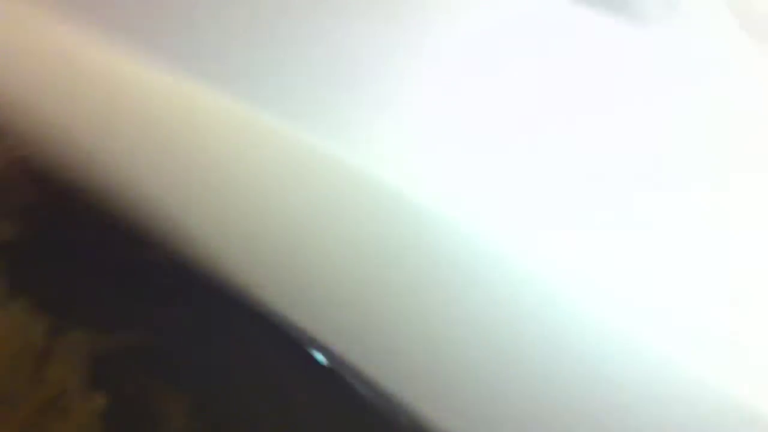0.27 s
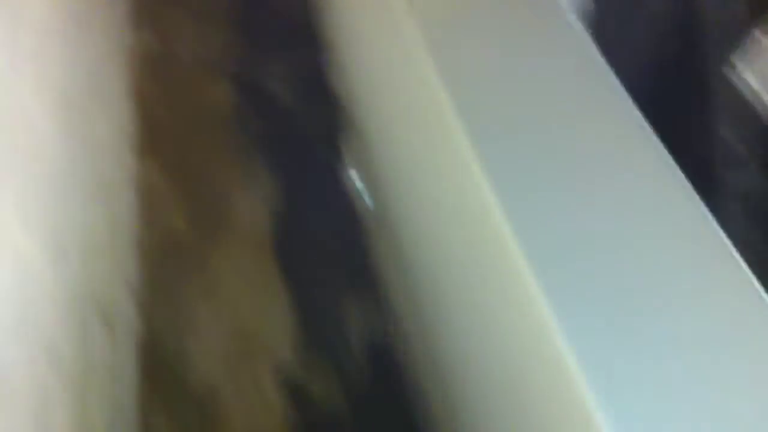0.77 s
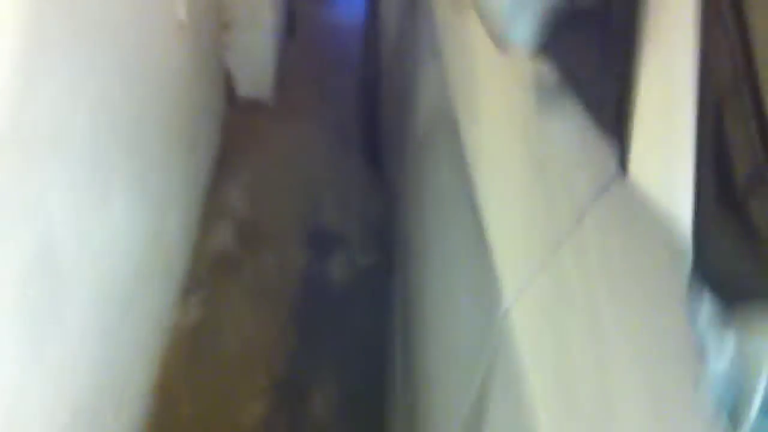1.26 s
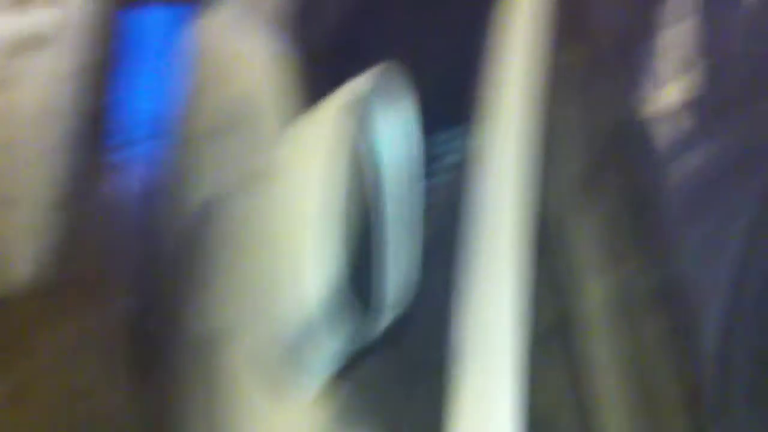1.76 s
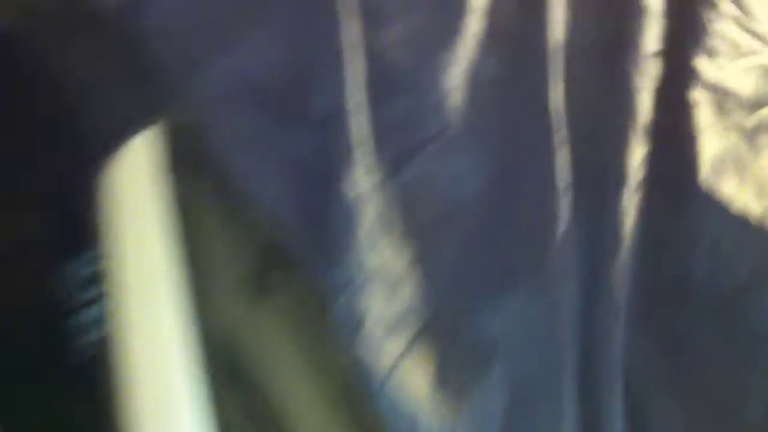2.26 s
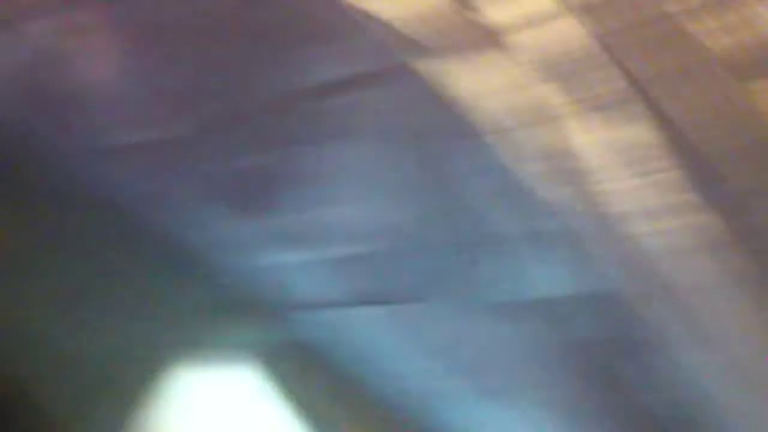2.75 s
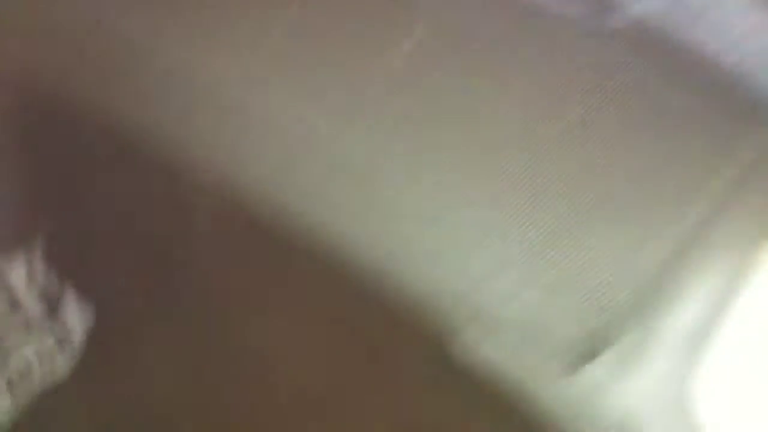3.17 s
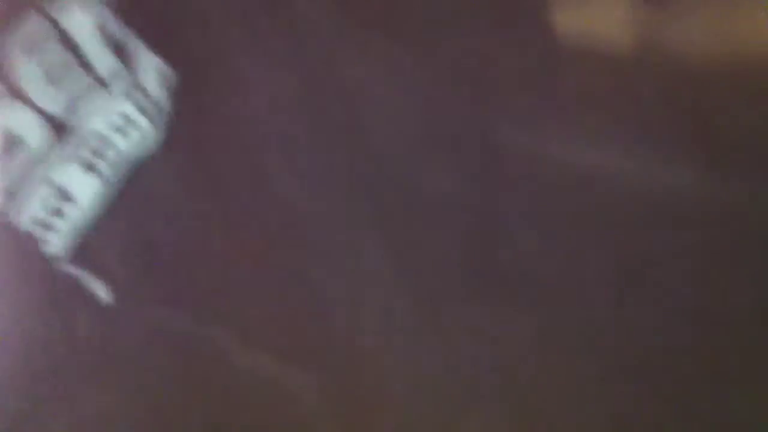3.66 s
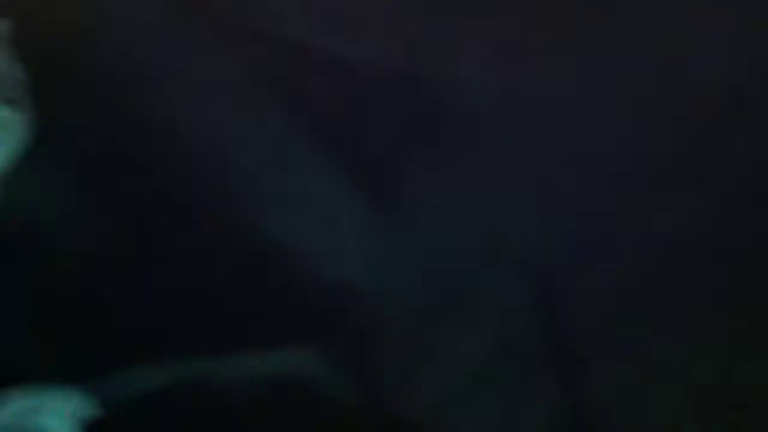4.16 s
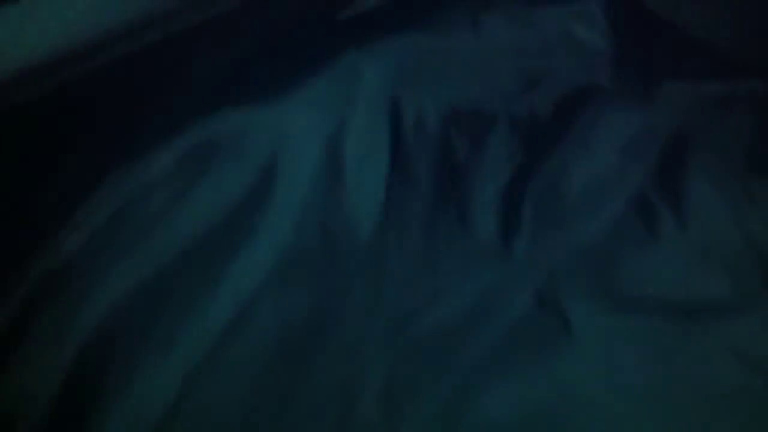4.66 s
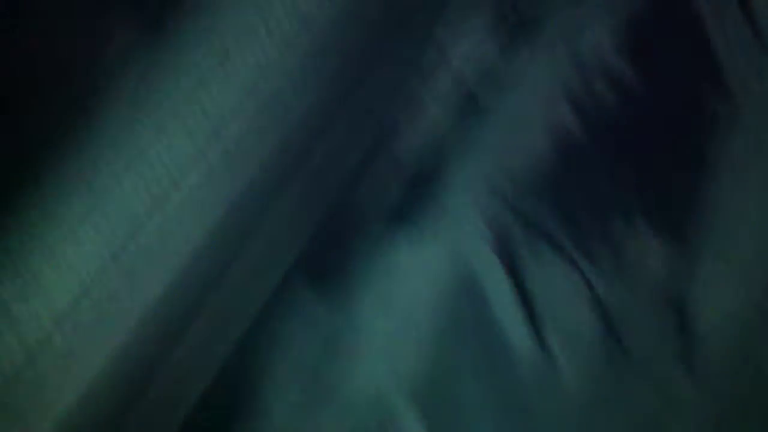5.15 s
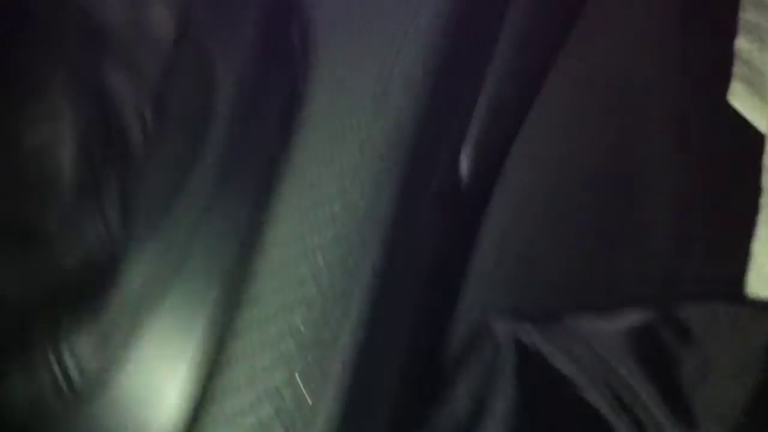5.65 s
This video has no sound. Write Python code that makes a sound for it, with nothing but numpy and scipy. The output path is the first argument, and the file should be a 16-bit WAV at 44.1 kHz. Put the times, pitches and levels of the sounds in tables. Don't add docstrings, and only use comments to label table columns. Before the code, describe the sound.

Steady engine idle with beating low boom, whirring blower and broad hiss, gradually receding and becoming muffled as the microphone sinks into the car's footwell.

```python
import sys
import numpy as np
from scipy import signal
from scipy.fft import rfft, irfft, next_fast_len
from scipy.io import wavfile
from scipy.ndimage import uniform_filter1d, map_coordinates

SR = 44100
rng = np.random.default_rng(int(sys.argv[2]) if len(sys.argv) > 2 else 0)


def volts_from_db(level):
    exponent = np.asarray(level, float) / 20
    return 10 ** exponent


def waveform_to_disk(signal):
    frames = np.transpose(np.atleast_2d(signal))
    scaled = np.clip(frames, -1, 1) * 32767
    samples = np.round(scaled).astype(np.int16)
    wavfile.write(sys.argv[1], SR, samples)


N = 260171


def unit(x):
    return x / np.sqrt(np.mean(x ** 2) + 1e-20)


def curves(rows):
    s, *cols = np.transpose(rows)
    return [np.interp(np.arange(N) / SR, s, c) for c in cols]


def wobble(rate):
    coarse = np.arange(0, N + 64, 64)
    knots = rng.standard_normal(int(N * 40 / SR) + 4)
    smooth = map_coordinates(knots, [coarse * min(rate, 40) / SR])
    return np.interp(np.arange(N), coarse, smooth)


def noise(spectrum, modes=(), patchy_db=0):
    z = signal.stft(rng.standard_normal(N), nperseg=1024)[2]
    field = uniform_filter1d(rng.standard_normal(z.shape), size=4, axis=0)
    field = uniform_filter1d(field, size=10, axis=1)
    x = signal.istft(z * volts_from_db(patchy_db * unit(field)), nperseg=1024)[1][:N]
    m = next_fast_len(N + 8192)
    hz = np.fft.rfftfreq(m, 1 / SR)
    f, db = np.transpose(spectrum)
    gain_db = np.interp(np.log(hz + 1), np.log(f + 1), db, left=-120, right=-120)
    gain_db += sum(lift_db * np.exp(-2 * ((hz - c) / width) ** 2) for c, width, lift_db in modes)
    return unit(irfft(rfft(x, m) * volts_from_db(gain_db), m)[:N])


def ramp(t, start_s, length_s):
    return np.sin(np.pi / 2 * np.clip((t - start_s) / length_s, 0, 1)) ** 2


# time_s, level_db
AWAY_LOSS = [
    (0, -0.5),
    (.45, -1.3),
    (.8, -0.26),
    (1.35, -1.35),
    (2.15, -4),
    (3.1, -5.5),
    (4, -8),
    (5.9, -9),
]
# bay_level_db, distance_share, behind_door_db, footwell_db
HEARD = dict(drone=(-33.5, 0.46, -9, -0.5), whirr=(-31, 0.8437, -8.5, -3.5), rush=(-33, 1.16, -4, -5.5),
         hiss=(-32, 1.12, -5.5, -6.5), low=(-40, 0.46, 1, 1.3), uneven=(-38, .01, -3, -4.5),
         hum=(-42.5, 0.2, -0.3, -17), pulley=(-44.5, 0.3, -2.5, -7.5), fan=(-51, 0.2, -0.5, 2.5),
         intake=(-52, 1, 8, -22), weak=(-.3, .01, .3, .3), third=(-.1, 0.053, .1, .1),
         diffuse=(-36, 0, -2.5, .1))
# time_s, half_width_s, lift_db
EXHAUST_SPOTS = dict( low=[(0, 0.18, 2), (1, .14, 6.5), (1.5, .2, 1), (2.1, .2, -7), (3.3, 0.57, 7.5),
                 (4, 0.44, 7.5), (5, .15, 3.5), (5.6, .13, -6)], uneven=[(0, 0.26, -7), (.75, 0.18, -13),
                 (2.4, .1, -9), (3.2, .15, 2.5), (3.7, 0.63, 4.5), (4.4, .1, -5)], third=[(.25, .5, -1.5),
                 (2.55, 0.32, 2), (4.2, 0.32, -2)], weak=[(.35, .4, 1.5), (3.75, .45, 3.5)])
# time_s, half_width_s, lift_db
BAY_SPOTS = dict( hum=[(.08, .15, -13), (.8, 0.18, -4), (1.2, 0.089, 4.5), (1.76, 0.21, 3.5),
             (2.28, 0.13, 8), (3.25, .2, -0.5), (4.5, .15, 1.5), (5.9, .08, 13)], pulley=[(.02, 0.051, 6),
             (.32, 0.27, 8), (2.08, 0.19, 6.5), (2.35, 0.11, -6), (5.85, .1, 5)], fan=[(1.4, .4, 4),
             (2.2, .55, 6), (4.15, .45, 8.5)], intake=[(.3, .75, 9)], whirr=[(.9, 0.6, 1.5)],
             drone=[(2.9, 0.66, 1.1), (4.1, .2, -1)], hiss=[(.15, .25, 1.3)])
DOOR_S, DOOR_LASTS_S = 4.06, 0.6
SINK_S, SINK_LASTS_S = 4.42, 0.78


def heard(name):
    near_db, share, door_db, sink_db = HEARD[name]
    t = np.linspace(0, N / SR, 2000)
    spots = {**EXHAUST_SPOTS, **BAY_SPOTS}.get(name, ())
    spots_db = sum(lift_db * np.exp(-((t - s) / width_s) ** 2) for s, width_s, lift_db in spots)
    shade_db = door_db * ramp(t, DOOR_S, DOOR_LASTS_S) + sink_db * ramp(t, SINK_S, SINK_LASTS_S)
    away_db = share * np.interp(t, *np.transpose(AWAY_LOSS))
    return curves(np.transpose([t, near_db + away_db + shade_db + spots_db]))[0]


# time_s, speed_rpm
IDLE = [(0, 872), (.5, 868.2), (.8, 871.7), (1.2, 878.7), (1.6, 874.2), (2, 870.6), (2.3, 869.8),
        (2.6, 871.7), (3.2, 874.2), (3.6, 870.8), (4, 872.4), (4.4, 869.7), (4.6, 871), (5.2, 872.8),
        (5.6, 868.6), (5.9, 872)]


def cycle():
    return 2 * np.pi * np.cumsum(curves(IDLE)[0] / 120) / SR


# start_s, length_s, level_db
RUSTLE = [
    (5.73, 0.14, -51),
]


def cloth():
    t = np.arange(N) / SR
    shape = 0
    for start_s, length_s, level_db in RUSTLE:
        progress = np.clip((t - start_s) / length_s, 0, 1)
        shape = shape + volts_from_db(level_db) * np.sin(np.pi * progress) ** .35
    brush = noise([(2000, -30), (5000, -6), (12000, 0), (15800, -5), (17000, -30)])
    return shape * volts_from_db(1.5 * wobble(35)) * brush


def fan():
    return np.sqrt(2) * volts_from_db(heard('fan')) * np.cos(11.965 * cycle() + 4.04)


# frequency_hz, level_db
PULLEY = [(2600, -60), (2760, -12), (2815, 0), (2865, -1), (2910, -12), (3100, -60)]


def pulley():
    jolt_db = 0.98 * np.cos(3 * cycle() - 2.2)
    return volts_from_db(heard('pulley') - 2.0 + jolt_db) * noise(PULLEY, patchy_db=-1.0)


# frequency_hz, level_db
DRONE = [(150, -32), (210, 0.5), (330, -5.5), (380, -4.5), (430, 0), (520, -1.5), (760, -7), (900, -6),
         (1100, -24)]
WHIRR = [(700, -40), (900, -3), (1100, 1), (1420, -2), (1700, 0), (2150, 0), (2350, -7.5), (2600, -30)]
RUSH = [(2150, -44), (2400, 3.5), (2750, 4.5), (3000, 0.5), (3400, -0.5), (3900, 1.5), (5000, 0.5),
        (6200, -1), (7000, -2.5), (7500, -44)]
HISS = [(6500, -38), (7000, -3.5), (8000, 0), (10800, -1), (11800, -3), (13800, -4.5), (15600, -12),
        (16500, -20)]
# frequency_hz, width_hz, lift_db
COVERS = [(1090, 49, 3), (1280, 125, 3), (1473, 47, 0), (1682, 30, 5), (2230, 27, 5.5)]
PIPES = [(4100, 38, 2.2), (4800, 97, 1.8), (7030, 64, 1.9), (7380, 95, 2.8), (7650, 50, 8.7),
         (8050, 170, 3.8), (8500, 120, 1), (10780, 240, 2.5)]


def bay():
    drone_db, whirr_db, rush_db, hiss_db = map(heard, ('drone', 'whirr', 'rush', 'hiss'))
    beat = np.cos(6 * cycle() + 1.2)
    shared = wobble(9)
    drone = volts_from_db(drone_db - 2.0 + 0.19 * beat) * noise(DRONE, patchy_db=1.16)
    whirr = volts_from_db(whirr_db - 1.5 + 0.3 * beat + 0.34 * shared) * noise(WHIRR, COVERS, patchy_db=1.3)
    rush = volts_from_db(rush_db + 0.21 * beat + 0.35 * shared) * noise(RUSH, PIPES, patchy_db=1.34)
    hiss = volts_from_db(hiss_db + 0.11 * beat + 0.17 * shared) * noise(HISS, PIPES, patchy_db=1.7)
    return drone + whirr + rush + hiss


# frequency_hz, level_db
WHINES = [(1088, -15), (1132, -16), (1274, -17), (1657, -16), (1886, -13), (1930, -15), (2204, -17),
          (3942, -26), (3985, -27), (10090, -26), (10132, -26)]


def blower():
    hum = np.sqrt(2) * volts_from_db(heard('hum')) * np.sin(cycle() * 60 + 0.37 * wobble(10))
    speed = curves(IDLE)[0] / 872
    turns = 2 * np.pi * np.cumsum(speed) / SR
    whine = 0
    for f, lift_db in WHINES:
        whine = whine + volts_from_db(lift_db + 3.5 * wobble(4)) * np.sin(f * turns + .9 * wobble(14))
    return hum + volts_from_db(heard('whirr')) * whine


# frequency_hz, level_db
RUMBLE = [(20, -40), (40, -24), (60, -16.5), (80, -29), (105, -3.5), (150, -2), (185, -1), (210, -13),
          (260, -18), (400, -60)]
WEAK_ORDERS = [16, 30, 33, 36, 42, 48, 63, 72]
# start_db, door_db
WEAK_LEVELS = [(-61, -65), (-50.5, -73), (-67, -68), (-51.5, -58), (-52.5, -60.5), (-56, -65),
               (-52.5, -57.5), (-53, -69)]
# time_s, path_m
DETOUR = [(0, -.15), (.45, .21), (.8, .15), (1.2, -0.28), (1.6, 0.22), (2, 0.33), (2.4, .33), (2.85, -.1),
          (3.2, -.13), (4.4, -.005), (5.9, 0.07)]
# time_s, level_db
BOOM = [(0, -24.5), (.6, -23), (.85, -25.5), (1.25, -33.5), (1.45, -32.5), (2.2, -21.5), (3, -17.5),
        (3.5, -19), (4.4, -27), (4.8, -36.5), (5, -37), (5.2, -42.5), (5.6, -36), (5.9, -35.5)]
THIRD_LEAD_S, THIRD_DB = 0.13, -6.5
FIRING, MISMATCH, LAZY = 3.41, .085, 4.571


def exhaust():
    angle = cycle()
    low_db, uneven_db, boom_db = heard('low'), heard('uneven'), curves(BOOM)[0]
    early_db = curves([(s - THIRD_LEAD_S, db + THIRD_DB) for s, db in BOOM])[0]
    third_power = volts_from_db(2 * early_db) + volts_from_db(2 * heard('diffuse'))
    third_db = heard('third') + 10 * np.log10(third_power)

    def order(k, at, db, drift):
        level = np.sqrt(2) * volts_from_db(db + drift * wobble(5))
        return level * np.cos(k * (angle - at) - .55 + .3 * drift * wobble(2.5))

    even = order(18, FIRING, third_db, .3) + order(24, FIRING, boom_db, .3)
    late = np.gradient(angle) * SR * curves(DETOUR)[0] / 343
    odd = order(15, MISMATCH + late, low_db, .4) + order(21, MISMATCH + late, uneven_db, .6)
    upper = order(57, FIRING, heard('intake'), 1.5) - order(27, MISMATCH + late, -49.5, 1.5)
    lazy = order(22, LAZY + late, uneven_db, .6) + order(23, LAZY, uneven_db - 8, 1.2)
    hiss_db = heard('hiss')
    hidden = np.clip((hiss_db[0] - 9.0 - hiss_db) / 9, 0, 1)
    weak = 0
    for k, (near_db, far_db) in zip(WEAK_ORDERS, WEAK_LEVELS):
        level_db = near_db + hidden * (far_db - near_db) + heard('weak')
        weak = weak + order(k, FIRING, level_db, k / 28)
    rumble = volts_from_db(0.59 * uneven_db - 19.0) * noise(RUMBLE, patchy_db=3.5)
    return even + odd + upper + lazy + weak + rumble


def scene():
    return np.tile(cloth() + fan() + pulley() + bay() + blower() + exhaust(), (2, 1))


# frequency_hz, threshold_db
GATE = [(1200, -80), (2000, -14), (3000, -9.5), (6000, -9.5), (11000, -7.5), (14000, -5), (15700, -2.5)]


def camera(x):
    hz, _, z = signal.stft(x, SR, nperseg=2048)
    power = np.abs(z) ** 2
    near = uniform_filter1d(power, size=4, axis=0)
    around = uniform_filter1d(uniform_filter1d(power, size=25, axis=0), size=5, axis=1)
    threshold = volts_from_db(2 * np.interp(hz, *np.transpose(GATE)))[:, None]
    kept = (near > around * threshold) & (hz < 15740)[:, None]
    return signal.istft(z * kept, SR, nperseg=2048)[1][:N]


# start_s, lower_edge_hz
SWAPS = [(.053, 8230), (.146, 8180), (.819, 13030), (1.144, 9580), (1.283, 5300), (1.376, 8250),
         (1.469, 5140), (1.469, 7560), (1.469, 10980), (1.701, 6240), (1.701, 8200), (1.933, 7900),
         (2.212, 5600), (2.212, 8170), (2.305, 4500), (2.398, 4180), (2.746, 4600), (2.746, 6850),
         (2.746, 9580), (3.28, 5620), (3.373, 13720), (4.325, 14000), (4.488, 10270), (4.673, 14380),
         (4.929, 6240), (4.929, 13090), (5.022, 4700)]
SWAP_WIDTH_HZ, SWAP_DB = 1450, -8
FIRST_FRAME = 273


def swapped():
    side, n = np.zeros(N + 2048), np.arange(2048) + .5
    hiss_db = heard('hiss') + SWAP_DB
    colour = np.transpose([(5000, -3.0), (9500, -1.5), (13000, -4), (15900, -10)])  # Hz, dB
    for s, lo_hz in SWAPS:
        hi_hz = lo_hz + SWAP_WIDTH_HZ
        db = hiss_db[round(s * SR)] + np.interp(hi_hz, *colour)
        bins = np.arange(round(lo_hz / SR * 2048), round(hi_hz / SR * 2048)) + .5
        cosines = np.cos(np.pi / 1024 * np.outer(n + 512, bins))
        band = cosines @ rng.standard_normal(1024)[:len(bins)]
        start = FIRST_FRAME + 1024 * (round((s * SR - FIRST_FRAME) / 1024) - 1)
        side[start:][:2048] += volts_from_db(db) * unit(band) * np.sin(np.pi * n / 2048)
    return side[:N] * [[1], [-1]]


def low_pass(x):
    return signal.sosfilt(signal.butter(12, 15790, fs=SR, output="sos"), x)


def record(dry):
    mix = camera(dry[0]) + swapped()
    return low_pass(mix)


dry = scene()
out = record(dry)
waveform_to_disk(out)
```